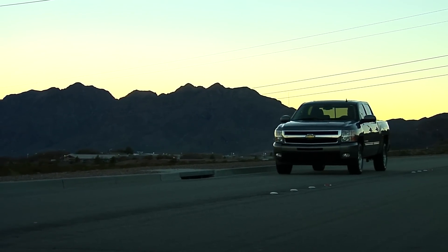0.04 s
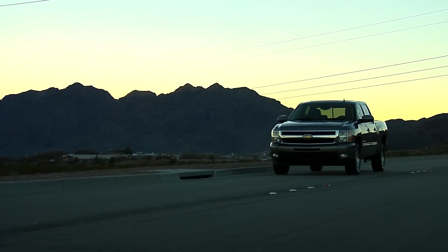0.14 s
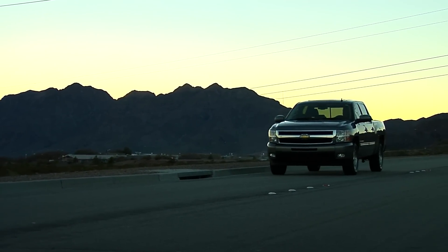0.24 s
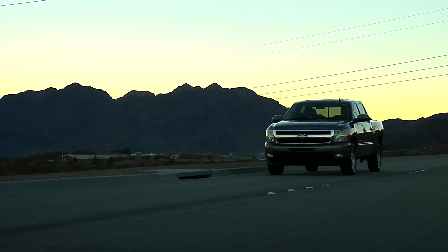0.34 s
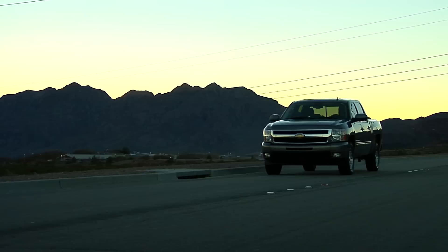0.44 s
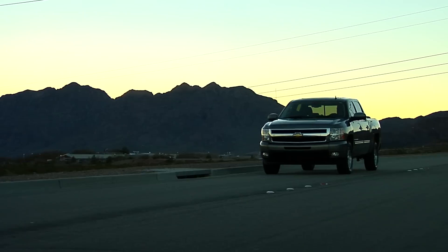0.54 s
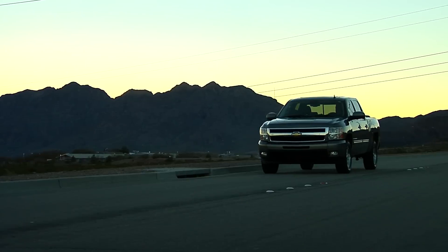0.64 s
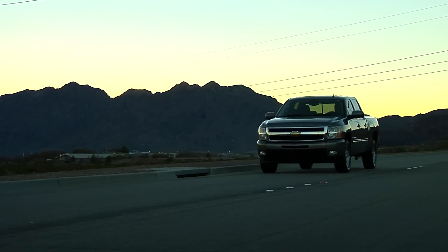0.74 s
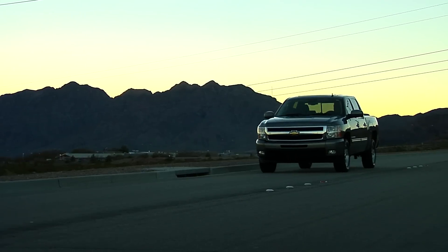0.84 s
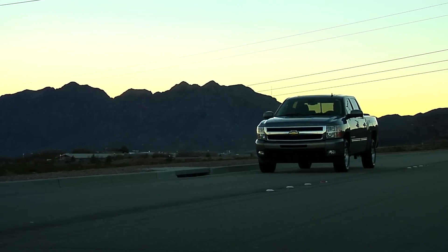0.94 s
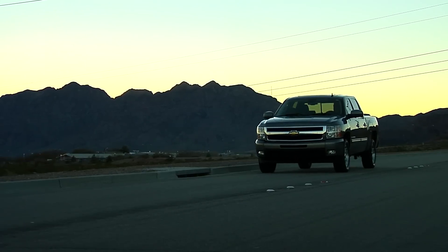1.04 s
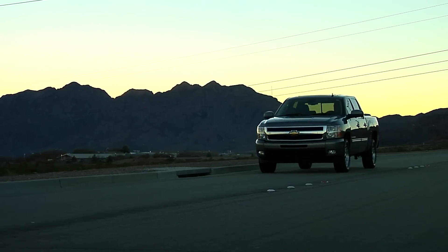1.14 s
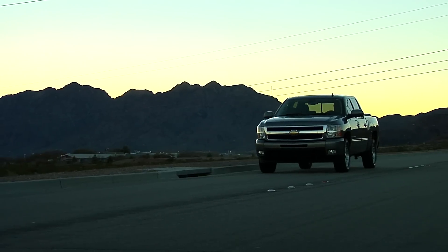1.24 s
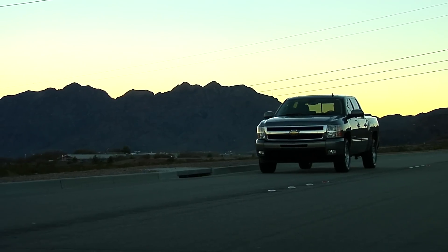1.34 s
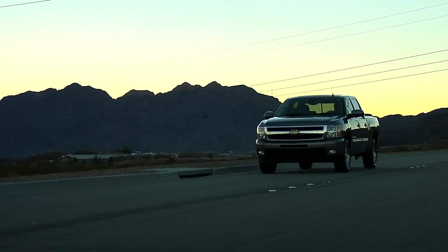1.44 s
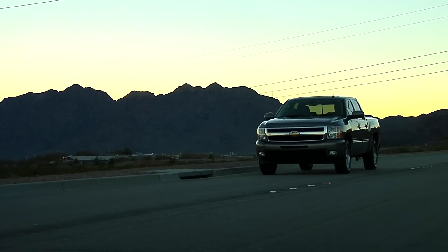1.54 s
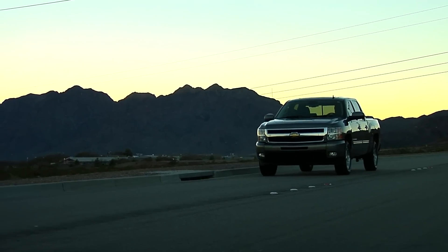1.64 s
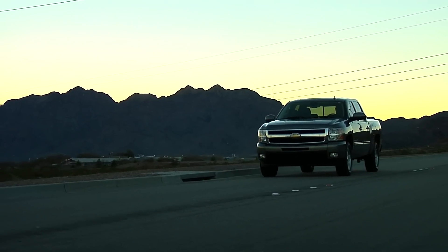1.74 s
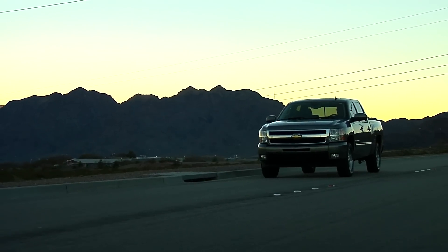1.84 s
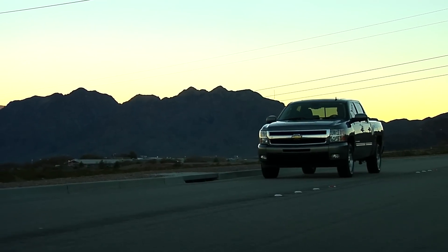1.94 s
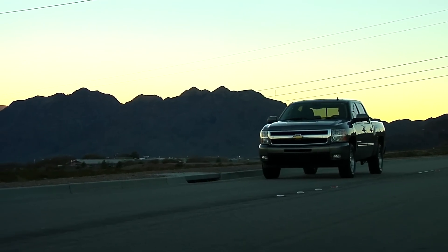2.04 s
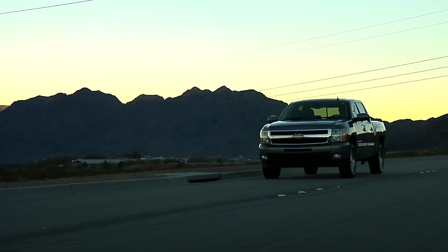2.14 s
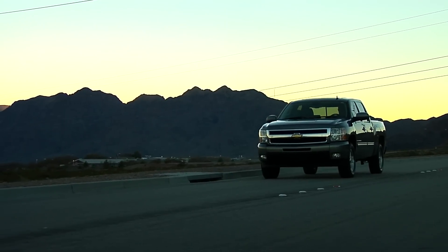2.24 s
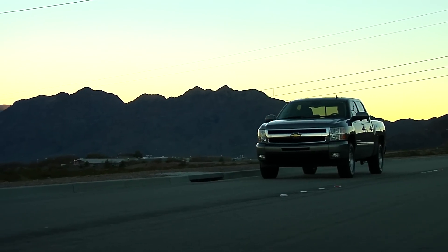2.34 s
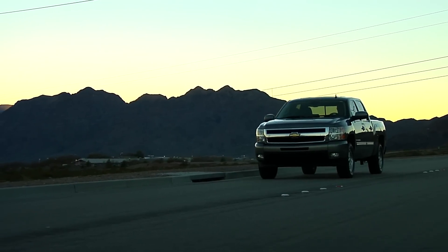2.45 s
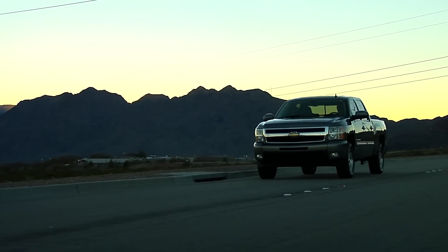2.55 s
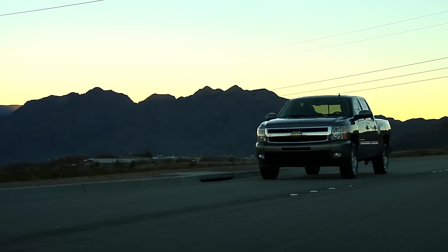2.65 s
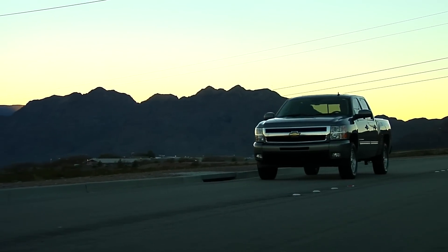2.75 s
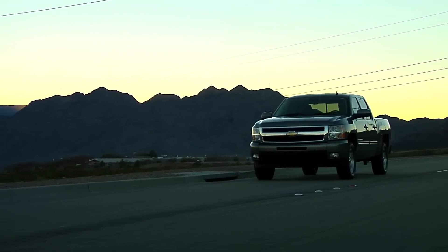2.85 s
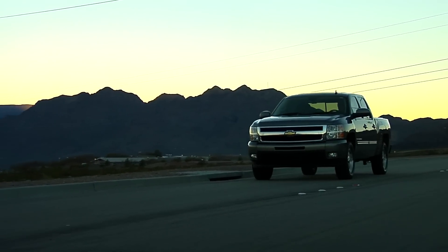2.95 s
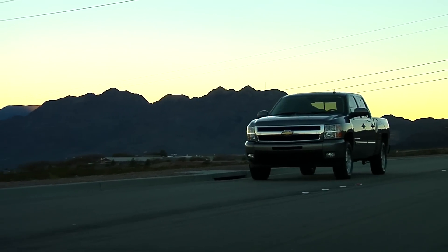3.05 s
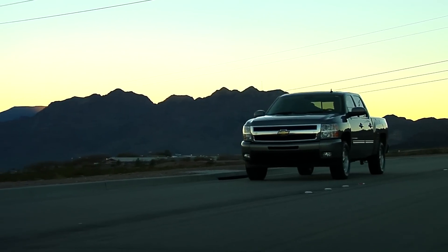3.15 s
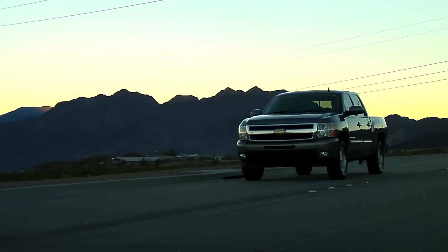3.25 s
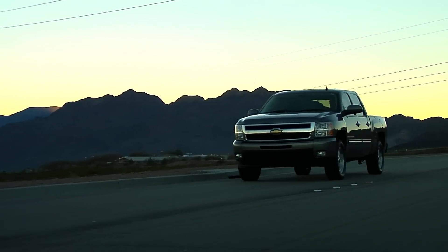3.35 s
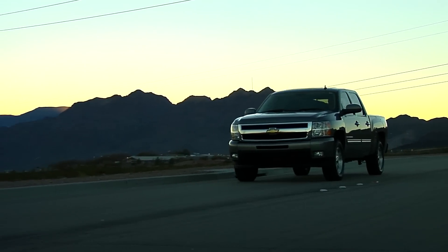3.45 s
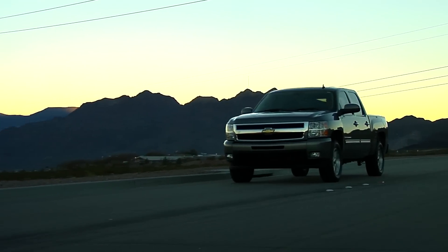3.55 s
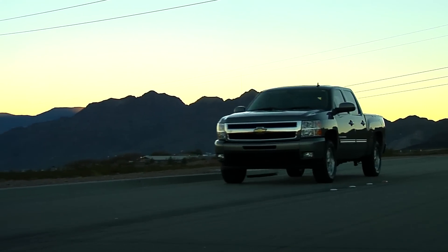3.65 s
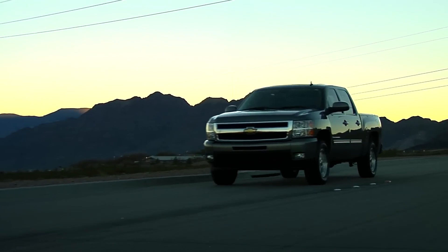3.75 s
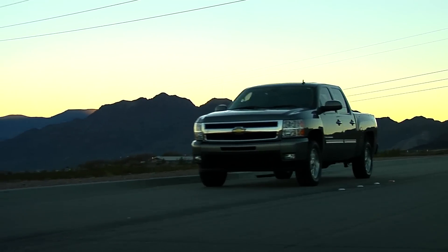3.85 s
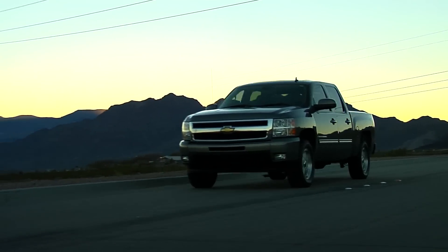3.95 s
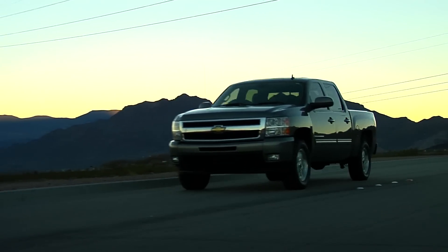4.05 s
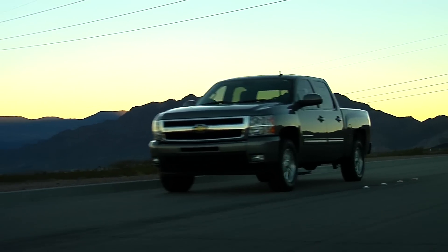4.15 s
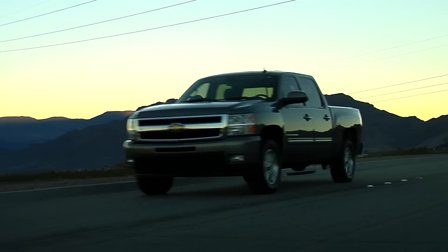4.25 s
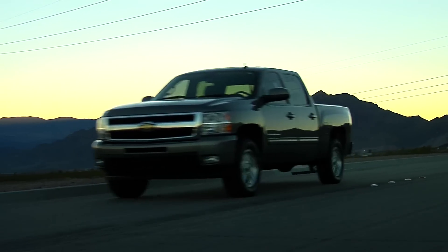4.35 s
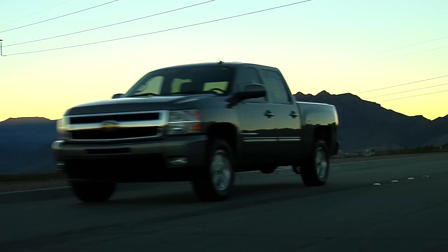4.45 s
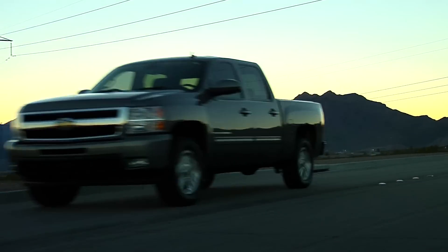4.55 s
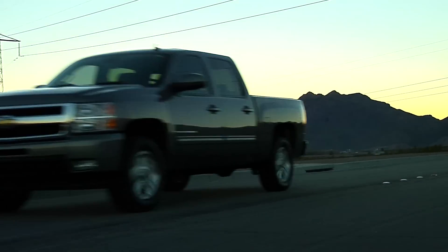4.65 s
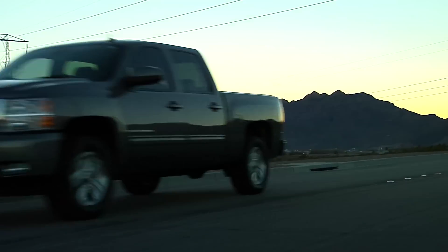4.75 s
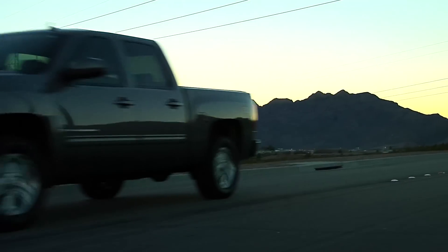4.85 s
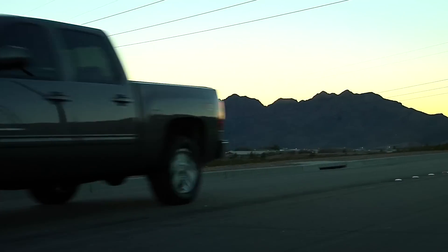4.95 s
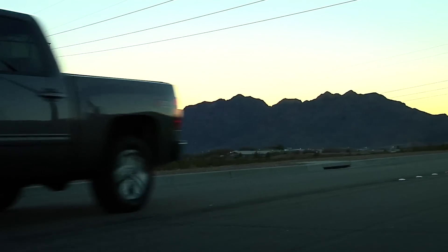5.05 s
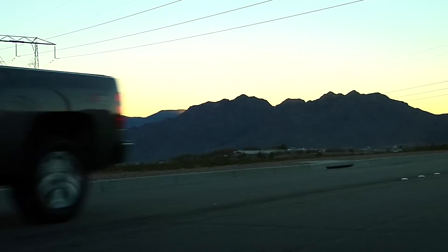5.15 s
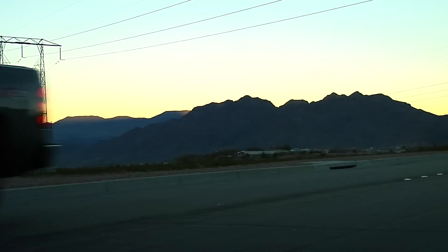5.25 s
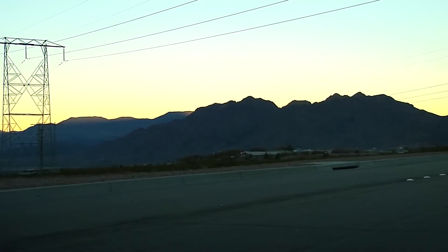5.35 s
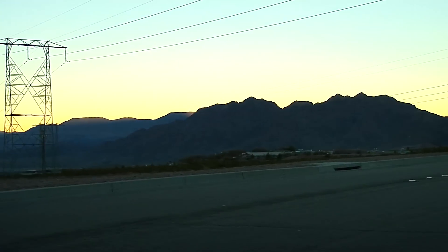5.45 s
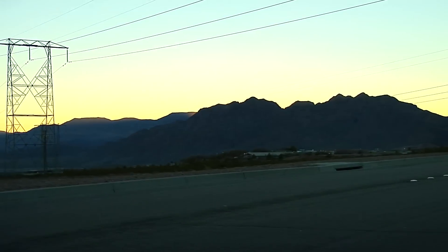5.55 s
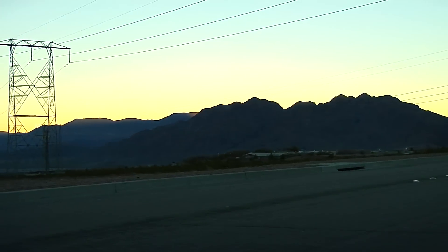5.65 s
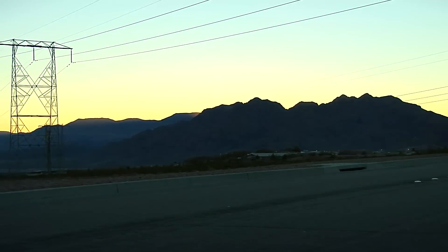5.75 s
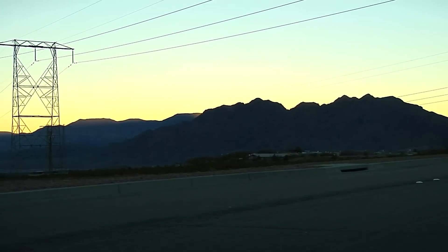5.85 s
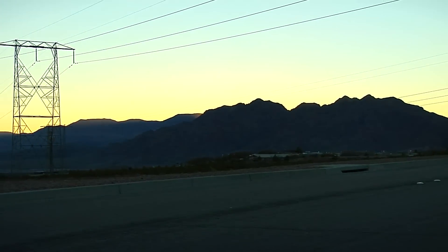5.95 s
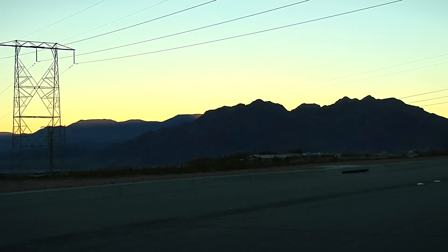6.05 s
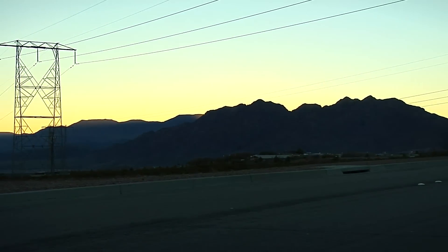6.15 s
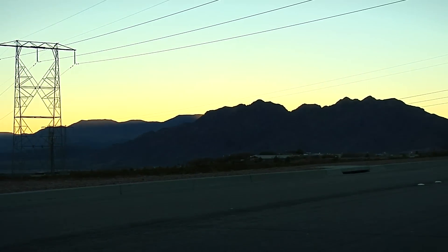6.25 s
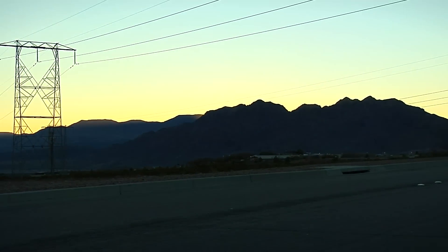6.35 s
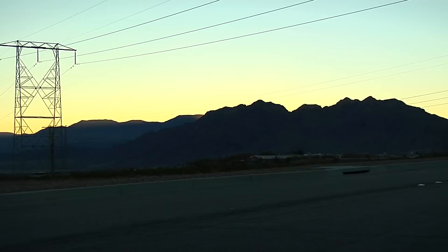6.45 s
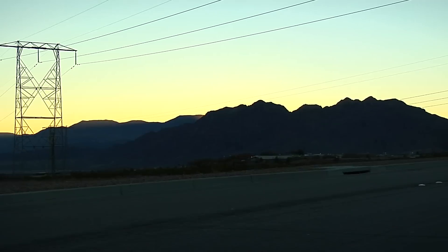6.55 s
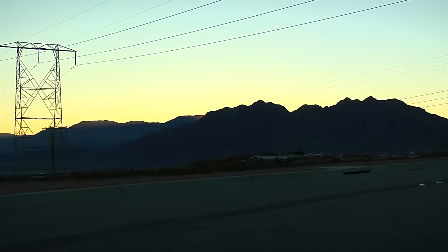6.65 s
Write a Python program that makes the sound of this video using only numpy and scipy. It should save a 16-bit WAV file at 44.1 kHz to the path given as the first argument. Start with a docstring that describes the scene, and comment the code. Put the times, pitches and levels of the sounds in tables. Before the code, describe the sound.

On an open desert highway, a pickup waits some way off with a quiet, low, wavering idle; a tiny click and thin high chirps sit near the microphone. At about two seconds the V8 opens up with a soft intake boom, climbs steadily and swells with tyre noise. It rushes close past a roadside microphone, shifts up, drops abruptly in pitch and recedes with a deep tailpipe burble.

```python
"""A low idling drone with a wavering hum is heard first, with a small click and a few thin, high chirps.
Then a V8 pickup on a desert highway pulls away, passes close by and shifts up just as it goes past.
Its engine, exhaust and tyres strengthen with engine speed and nearness.
Engine orders glide through fixed resonances; shaped noise makes the exhaust gas, tyres and rushing air.
Ahead, the intake and tyres colour the sound; behind, the tailpipe burble takes over."""
import sys
import numpy as np
from scipy import signal
from scipy.fft import rfft, irfft, next_fast_len
from scipy.io import wavfile
from scipy.ndimage import uniform_filter1d

SR = 44100
rng = np.random.default_rng(int(sys.argv[2]) if len(sys.argv) > 2 else 0)


def output_pcm(signal):
    """Save a mono or channel-first signal as 16-bit PCM at the path in sys.argv[1].

    Samples are clipped to [-1, 1] before scaling.
    """
    pcm = np.clip(np.atleast_2d(signal).T, -1, 1) * 32767
    wavfile.write(sys.argv[1], SR, np.round(pcm).astype(np.int16))


N = 295470
TIME = np.arange(N) / SR  # s


def amp(db):
    """Decibel law: 20 dB is a tenfold amplitude."""
    return 10 ** (np.asarray(db) / 20)


def evened(x):
    """Normalisation to unit root-mean-square level."""
    return x / np.sqrt(np.mean(x ** 2) + 1e-20)


def curves(rows):
    """Linear interpolation in time of each column of a table."""
    s, *columns = np.transpose(rows)
    return [np.interp(TIME, s, c) for c in columns]


def read(points, hz):
    """Spectral envelope: dB along log frequency, with an added fall above the last point."""
    f, db = np.transpose(points)
    envelope_db = np.interp(np.log(hz + 1), np.log(f), db)
    return envelope_db - 20 * np.log2(np.maximum(hz / f[-1], 1))


def bumps(modes, hz):
    """Resonance: the summed dB gain of bell curves, each halved half a width from its centre."""
    return sum(db / (1 + (2 * (hz - f) / width) ** 2) for f, width, db in modes)


def wander(rate_hz):
    """Random modulation: straight lines join random values, scaled to unit level."""
    knots = rng.standard_normal(2048)
    return evened(np.interp(TIME * rate_hz, np.arange(len(knots)), knots))


def noise(spectrum, modes=()):
    """Spectral shaping: white noise is coloured by an envelope and resonances, at unit level."""
    size = next_fast_len(N)
    hz = np.fft.rfftfreq(size, 1 / SR)
    white = rfft(rng.standard_normal(size))
    coloured = irfft(white * amp(read(spectrum, hz) + bumps(modes, hz)), size)
    return evened(coloured[:N])


def turn(at_s, span_s):
    """Sigmoid transition: a smooth change from 0 to 1 around a moment."""
    return .5 + .5 * np.tanh((TIME - at_s) / span_s)


def crossfade(share, before, after):
    """Equal-power crossfade: two independent noises trade their power."""
    return np.sqrt(1 - share) * before + np.sqrt(share) * after


def tone(hz, db, waver):
    """Frequency modulation: the phase of a sine sums its randomly wavering pitch."""
    phase = 2 * np.pi * np.cumsum(hz * (1 + waver * wander(60))) / SR
    return np.sqrt(2) * amp(db) * np.sin(phase)


def swell(centre_s, sigma_s, db):
    """Gaussian envelope: a bell-shaped rise and fall."""
    return amp(db) * np.exp(-.5 * ((TIME - centre_s) / sigma_s) ** 2)


def sing(centre_s, sigma_s, hz, db, waver):
    """Amplitude modulation: a wavering tone swells and fades."""
    return swell(centre_s, sigma_s, db) * tone(hz, 0, waver)


# spectrum of the waiting truck and the open air: pitch_hz, relative_level_db
IDLE_SPECTRUM = [(12, -35), (20, -15), (42, -8), (70, -3.5), (92, -1.5), (144, -5), (306, -13), (352, -23),
                 (534, -15), (705, -21), (1130, -30), (1340, -30), (1450, -33.5), (3260, -46.5),
                 (15500, -49.5)]
# hum lines of the waiting truck: pitch_hz, relative_level_db
HUM_LINES = [(102.3, -56), (145.3, -59), (188.4, -59), (473.7, -81)]
# the road's reflection cancels and lifts bands of idle and oncoming roar: pitch_hz, width_hz, gain_db
ROAD_REFLECTION = [(712, 183, -8.5), (1120, 140, -0.5), (1307, 89, -14.5), (1920, 230, 3.5)]


def idle(air_db=-51.0, hum_db=-2.0):
    """Superposition of shaped noise and wavering lines; the lines give way as the throttle opens."""
    hum = sum(tone(hz, db + hum_db, waver=0.036) for hz, db in HUM_LINES)
    air = amp(air_db) * noise(IDLE_SPECTRUM, ROAD_REFLECTION)
    return air + hum * (1 - turn(1.7, 0.27))


# onsets of the small click: start_s, level_db
CLICK_ONSETS = [(0.663, -51), (.669, -51.5)]
# modes that each click rings with: pitch_hz, relative_level_db, t60_s
CLICK_RING = [(617, 0, 0.058), (900, -8, 0.027), (1070, 0, 0.033), (1177, -4, 0.067), (3030, -28, .04),
              (5030, -24, .04)]


def clicks():
    """Modal ringing: an impact excites sines that decay exponentially."""
    out = np.zeros(N)
    t = TIME[:SR // 4]
    for start_s, level_db in CLICK_ONSETS:
        ring = sum(amp(level_db + db - 60 * t / t60) * np.sin(2 * np.pi * hz * t)
                   for hz, db, t60 in CLICK_RING)
        out[round(start_s * SR):][:len(t)] += ring
    return out


# thin chirps: centre_s, sigma_s, relative_level_db
CHIRP_SWELLS = [(.275, .014, -73), (.58, 0.021, -69), (.645, .022, -75), (1.115, .018, -73)]


def chirps(pitch_hz=10150, level_db=-3.5):
    """Amplitude modulation: short bell-shaped swells gate one high tone."""
    return sum(swell(*row) for row in CHIRP_SWELLS) * tone(pitch_hz, level_db, waver=0.0011)


# a soft scuff, then thin sizzles during the pass: centre_s, sigma_s, pitch_hz, level_db, width_octaves
NOISE_SWELLS = [(1.278, .03, 850, -65.5, 0.88), (4.65, .33, 10240, -79, .07),
                (5.33, 0.13, 10500, -74.5, .09), (6.18, 0.14, 5400, -69, 0.22)]


def hush(centre_s, sigma_s, hz, db, octaves):
    """Band-limited noise: a brief swell clusters around one pitch."""
    spread = 2. ** (octaves * np.arange(-2, 3))
    return swell(centre_s, sigma_s, db) * noise(np.c_[hz * spread, [-40, -8, 0, -8, -40]])


# a short hoot as the tail goes by: centre_s, sigma_s, pitch_hz, level_db
HOOT_SWELL = (5.533, .013, 590, -25)


def small_sounds():
    """Superposition: the click, chirps, tail hoot and noise swells add independently."""
    hushes = sum(hush(*row) for row in NOISE_SWELLS)
    return clicks() + chirps() + sing(*HOOT_SWELL, waver=.016) + hushes


# the drive: steady acceleration from rest along a lane beside the listener
START_S, ABREAST_S, ACCEL_M_PER_S2, LANE_M = 2.05, 5.416, 3.42, 4.14
REF_HZ = 200  # firing rate at which source levels are stated


def drawn_level(source, firing_hz):
    """Inverse-distance law: level falls 6 dB per doubled distance and rises with engine speed."""
    level_db, per_doubling_db, place_m, spread_m = source
    travel = np.maximum(TIME - START_S, 0) ** 2 - (ABREAST_S - START_S) ** 2
    along_m = .5 * ACCEL_M_PER_S2 * travel - place_m
    distance_m = np.sqrt(along_m ** 2 + LANE_M ** 2 + spread_m ** 2)
    return level_db + per_doubling_db * np.log2(firing_hz / REF_HZ) - 20 * np.log10(distance_m / LANE_M)


# Carrying of each source; place is behind the truck's middle, level is at LANE_M and REF_HZ
# before the source's own gains: relative_level_db, per_speed_doubling_db, place_m, spread_m
EXHAUST_CARRY = (-18.5, 9, 2, 0.8)
ROAR_CARRY = (-29.5, 12, 1.36, 8)
TREAD_CARRY = (-53, 1.5, -2.9, 3.1)


def drive_levels(firing_hz, pull, far):
    """Directivity: exhaust and roar gain behind the truck; the body hides the tread hiss at first."""
    rear = turn(5.83, 0.22)
    drive_db = drawn_level(EXHAUST_CARRY, firing_hz) + 5.5 * rear
    roar_db = drawn_level(ROAR_CARRY, firing_hz) + 4.5 * rear - 0.9 * pull
    hidden = 1 - turn(4.38, .15)
    hiss_db = drawn_level(TREAD_CARRY, firing_hz) - 13 * hidden - 5 * far  # treble is lost far away
    return drive_db, roar_db, hiss_db


def roar_level(x):
    """Band-level normalisation: the 750-3000 Hz band is brought to unit level."""
    band = signal.butter(4, [750, 3000], "band", fs=SR, output="sos")
    return x / signal.sosfilt(band, x).std()


# colour of tyres and rushing air from ahead, beside and behind: pitch_hz, relative_level_db
ROAR_AHEAD = [(25, -11), (60, 2), (100, 2.5), (250, 8), (380, 0.5), (470, 12.5), (600, 13), (750, 5.5),
              (1050, 3), (1500, -3), (2000, -12.5), (2400, -18), (3300, -23), (5000, -29)]
ROAR_BESIDE = [(25, -20.5), (60, -8), (90, -1.5), (250, 5.5), (550, 7.5), (750, 3.5), (1150, 1),
               (1500, -2.5), (2000, -5), (2600, -11.5), (3600, -20.5), (5000, -29.5)]
ROAR_BEHIND = [(25, -21.5), (70, -2), (250, 4), (560, 9.5), (780, 2.5), (1100, 3), (1600, -3), (2100, -10),
               (2800, -18.5), (3600, -26.5), (4400, -40)]
# further down the road, its reflection hollows the roar: pitch_hz, width_hz, gain_db
FAR_REFLECTION = [(800, 170, -6.5), (1150, 250, 4)]


def road(cycles, far, roar_db=-2.0, flutter_db=0.36, throb=0.06):
    """Directional filtering: roar changes colour with angle and throbs a little with the engine."""
    ahead = roar_level(noise(ROAR_AHEAD, ROAD_REFLECTION))
    front = crossfade(turn(4.525, 0.23), ahead, roar_level(noise(ROAR_BESIDE)))
    distant = roar_level(noise(ROAR_BEHIND, FAR_REFLECTION))
    back = crossfade(far, roar_level(noise(ROAR_BEHIND)), distant)
    roar = crossfade(turn(5.456, .15), front, back)
    beat = np.cos(2 * np.pi * 3 * cycles)
    return roar * amp(roar_db + flutter_db * wander(40)) * (1 + throb * beat)


# spectrum of the fine tread hiss: pitch_hz, relative_level_db
TREAD_SPECTRUM = [(2500, -7), (3800, -2), (5200, 0.5), (7600, -6), (9200, -20.5), (10300, -18.5),
                  (11800, -32), (15000, -32.5)]


def tyre_hiss(hiss_db=-2.0, notch_hz=4300, notch_db=-16):
    """Comb-like interference: the road's reflection hollows the tread hiss as the truck draws away."""
    hollow = noise(TREAD_SPECTRUM, [(notch_hz, 1100, notch_db), (9000, 1400, 7)])
    return amp(hiss_db) * crossfade(turn(5.9, .35), noise(TREAD_SPECTRUM), hollow)


def patchy(x, depth_db=2.0, width_bins=5, length_frames=12):
    """Scintillation: moving air and the shifting road reflection lift and sink narrow bands."""
    z = signal.stft(x, nperseg=2048, noverlap=1536)[2]
    patches = uniform_filter1d(rng.standard_normal(z.shape), width_bins, 0)
    patches = evened(uniform_filter1d(patches, length_frames, 1))
    y = signal.istft(z * amp(depth_db * patches), nperseg=2048, noverlap=1536)[1][:N]
    return y * x.std() / y.std()


# resonance that lifts the whine: pitch_hz, width_hz, gain_db
WHINE_RESONANCE = [(1117, 235, 19)]


def whine(firing_hz, drive_db, behind, whine_db=-37, rear_db=-3, ratio=5.47):
    """Fixed drive ratio: a belt-driven whine follows engine speed and is weaker from behind."""
    hz = ratio * firing_hz
    return tone(hz, drive_db + whine_db + rear_db * behind + bumps(WHINE_RESONANCE, hz), waver=.007)


# the intake booms as the throttle first opens: centre_s, sigma_s, pitch_hz, level_db
INTAKE_BOOMS = [(2.022, 0.093, 201.7, -46.5), (2.29, 0.092, 215.4, -42.5)]
# a faint whistle under load: centre_s, sigma_s, pitch_hz, level_db
LOAD_WHISTLE = (4, 0.42, 3795, -72)


def booms_and_whistle():
    """Transient tones: intake booms and a load whistle swell and fade at their own pitches."""
    booms = sum(sing(*row, waver=0.0306) for row in INTAKE_BOOMS)
    return booms + sing(*LOAD_WHISTLE, waver=.007)


# spectrum of the exhaust gas: pitch_hz, relative_level_db
GAS_SPECTRUM = [(30, -31), (70, -11.5), (130, -1.5), (240, 7), (400, -2.5), (600, -6), (900, -22),
                (2000, -31)]


def exhaust_gas(cycles, behind, pull, ahead_db=-16, behind_db=-8.5, pull_db=-4, depth=0.41):
    """Pulsed turbulence: noise leaves in a puff at every firing, with a slower unevenness."""
    firings = depth * np.cos(2 * np.pi * 8 * cycles)
    puffs = evened(1 + firings + .3 * np.cos(2 * np.pi * 3 * cycles))
    level_db = ahead_db + (behind_db - ahead_db) * behind + pull_db * pull
    return noise(GAS_SPECTRUM) * puffs * amp(level_db)


# resonances that lift the firing note as it glides through them: pitch_hz, width_hz, gain_db
NOTE_RESONANCES = [(95, 35, 9), (150, 44, 0.5), (182, 12, -2.5), (233.4, 55, 5)]
# the firing note surges during the upshift: centre_s, sigma_s, relative_level_db
NOTE_SURGES = [(5.318, 0.019, -20), (5.434, 0.026, -17)]


def firing_note(cycles, firing_hz, drive_db, note_db=-12.5, fade_db=1.65, jitter_rad=0.077):
    """Source and filter: the note of eight firings a cycle glides through resonances and surges."""
    size = amp(drive_db + note_db + bumps(NOTE_RESONANCES, firing_hz))
    size = size + sum(swell(*row) for row in NOTE_SURGES)
    phase = 2 * np.pi * 8 * cycles + jitter_rad * wander(35)
    return np.sqrt(2) * size * amp(fade_db * wander(14)) * np.cos(phase)


# unevenly spaced pulses in each bank give many orders; order is a multiple of the engine cycle:
# order, ahead_relative_level_db, beside_relative_level_db, behind_relative_level_db
ENGINE_ORDERS = [(1.9884, -31, -34, -35.5), (3, -17, -14.5, -15.5), (4, -25.5, -19, -18.5),
                 (5, -11, -15, -6), (6.05, -20.5, -19, -19.5), (6.9, -11.5, -14.5, -18),
                 (9.08, -15.5, -8.5, -24.5), (9.84, -19.5, -17, -12), (10.89, -13.5, -9.5, -9.5),
                 (12.03, -26.5, -10, -29), (13.07, -12, -26.5, -31), (14, -11.5, -24, -12),
                 (15.1, -17.5, -18, -23.5), (16, -11.5, -17, -21), (17, -17.5, -28, -21.5),
                 (18.12, -16, -13, -24), (19, -15, -23, -16), (20.76, -25.5, -30, -25.5),
                 (23, -23, -39, -22), (29.05, -26, -25.5, -24.5), (31.5, -21.5, -32, -31),
                 (36.2, -32.5, -29.5, -31), (48, -40.5, -43, -46.5)]
# resonances of the intake, the underbody and the tailpipe: pitch_hz, width_hz, gain_db
INTAKE_RESONANCES = [(103, 14, 1.5), (176, 38, -12.5), (231.5, 77, 11), (275, 22.3, -9.5), (301.5, 30.5, 9),
                     (410, 30, -8.5), (478, 35, 6)]
UNDERBODY_RESONANCES = [(103, 13, 3.7), (147, 21, 10.3), (225, 24, 2.1), (390, 63, 6.5)]
TAILPIPE_RESONANCES = [(128, 11, -3), (269, 12, 4), (454, 25, 5), (493, 26, 2), (601, 36, 6),
                       (684.8, 28, 6.5), (730, 58, -5.5)]
# shifts of the low tailpipe resonances once the next gear pulls: pitch_hz, width_hz, gain_db
PULL_RESONANCES = [(76, 38, 7.5), (121, 30, -8), (270.76, 30, 4.5), (351, 45, -4)]


def engine(cycles, cycle_hz, behind, pull, firing_db=6.5, uneven_db=-6, fade_db=2.0, smear_rad=.006):
    """Order synthesis: engine orders glide through fixed resonances; high orders are less steady."""
    order, *patterns = np.transpose(ENGINE_ORDERS)
    resonances = INTAKE_RESONANCES, UNDERBODY_RESONANCES, TAILPIPE_RESONANCES
    step = 64  # samples between updates of the levels
    light_load = (1 - turn(3.47, 0.36))[::step]
    beside, rear = turn(5.027, 0.19)[::step], behind[::step]
    shares = (1 - beside) * (1 - rear), beside * (1 - rear), rear
    out = np.zeros(N)
    for k in np.r_[2:8, 9:49]:  # order 8 is the firing note, made on its own
        hz = k * cycle_hz[::step]
        size = sum(share * amp(np.interp(k, order, pattern) + bumps(modes, hz))
                   for share, pattern, modes in zip(shares, patterns, resonances))
        # under light load multiples of the firing note stand out; the burble grows with the throttle
        load_db = light_load * (firing_db if k % 8 == 0 else uneven_db)
        size = size * amp(load_db + pull[::step] * bumps(PULL_RESONANCES, hz))
        phase = 2 * np.pi * (k * cycles + rng.random()) + smear_rad * k * wander(35)
        out += np.interp(TIME, TIME[::step], size) * amp(fade_db * wander(9)) * np.cos(phase)
    return out


# engine cycles per second as heard, Doppler shift included, through idle, launch, climb,
# upshift and slow climb: time_s, cycle_rate_hz
ENGINE_SPEED = [(1.97, 5.56), (2.32, 10.7), (2.48, 12.7), (2.97, 14.1), (3.16, 15), (3.55, 19.2),
                (3.82, 21.2), (4.09, 24.3), (4.56, 28.64), (5.07, 32.2), (5.21, 33.3), (5.29, 32.4),
                (5.36, 30.4), (5.59, 23.3), (6.01, 23.83), (6.62, 25.13), (6.7, 24.5)]


def scene():
    """Superposition of moving sources: the truck pulls away, passes and shifts up."""
    cycle_hz, = curves(ENGINE_SPEED)
    firing_hz = 8 * cycle_hz  # eight firings to a cycle
    cycles = np.cumsum(cycle_hz) / SR
    behind, far = turn(5.47, .07), turn(6.38, 0.12)
    pull = turn(6.14, 0.11)  # once the next gear pulls, the sound turns smoother and deeper
    drive_db, roar_db, hiss_db = drive_levels(firing_hz, pull, far)

    rolling = patchy(amp(roar_db) * road(cycles, far) + amp(hiss_db) * tyre_hiss())
    burble = engine(cycles, cycle_hz, behind, pull) + exhaust_gas(cycles, behind, pull)
    motor = amp(drive_db - pull) * burble  # the burble drops 1 dB in the next gear
    motor = motor + firing_note(cycles, firing_hz, drive_db + 9.5 * pull)
    motor = motor + whine(firing_hz, drive_db, behind)
    truck = turn(1.9, 0.1) * (motor + rolling + booms_and_whistle())
    return (idle() + small_sounds() + truck)[None]


def record(dry, edge_hz=15700):
    """Low-pass filtering: a linear-phase filter limits the band, after a brief fade at both ends."""
    faded = dry * signal.windows.tukey(N, .003)
    lowpass = signal.firwin(511, edge_hz, window=("kaiser", 9), fs=SR)
    return signal.oaconvolve(faded, lowpass[None], "same")


dry = scene()
out = record(dry)
output_pcm(out)
```